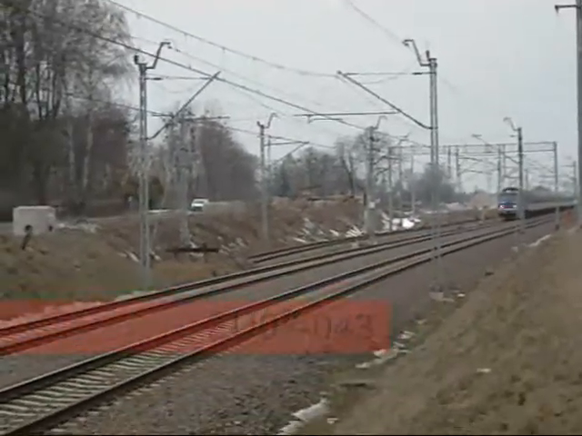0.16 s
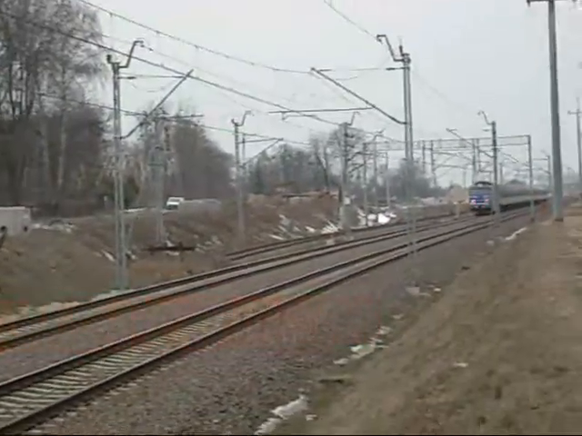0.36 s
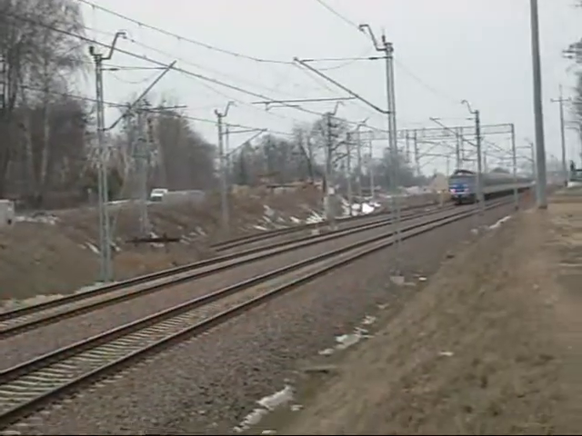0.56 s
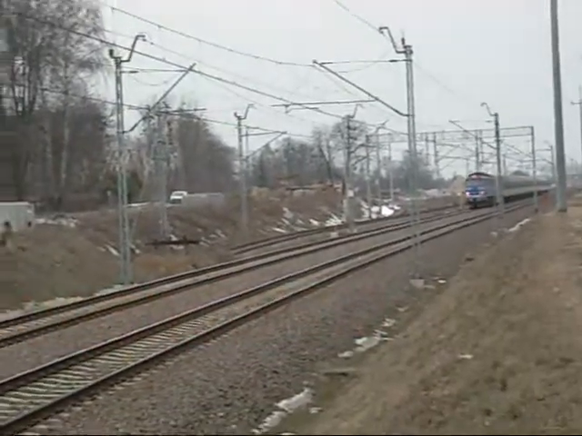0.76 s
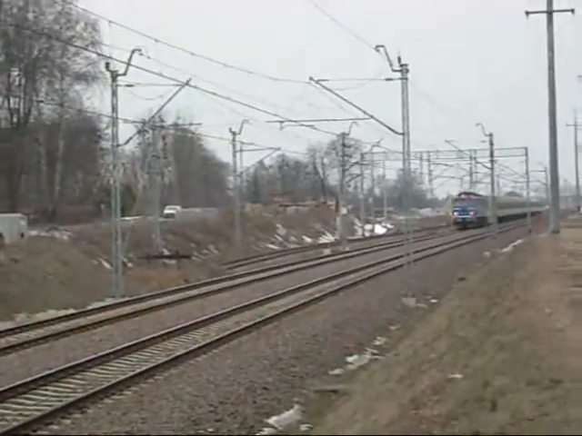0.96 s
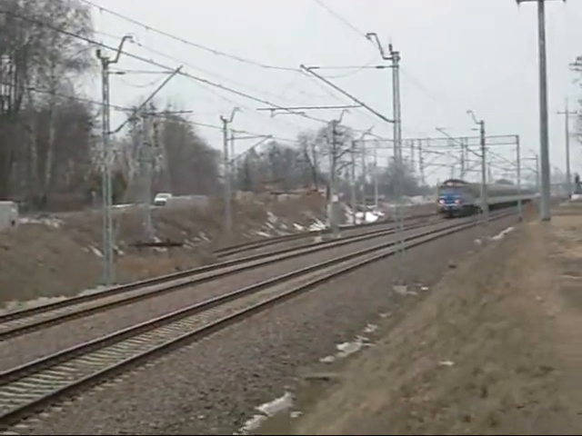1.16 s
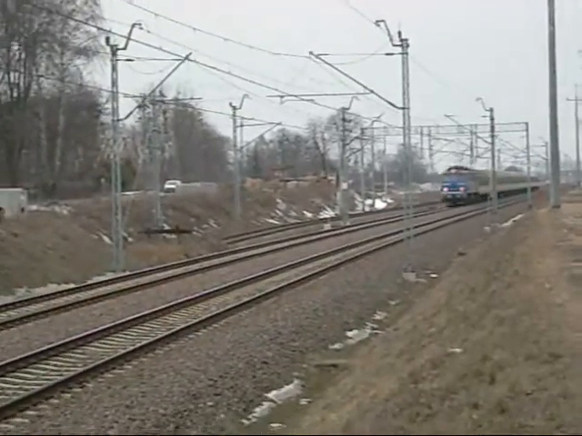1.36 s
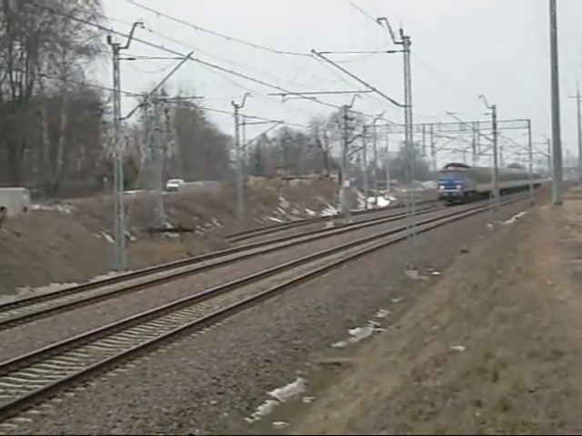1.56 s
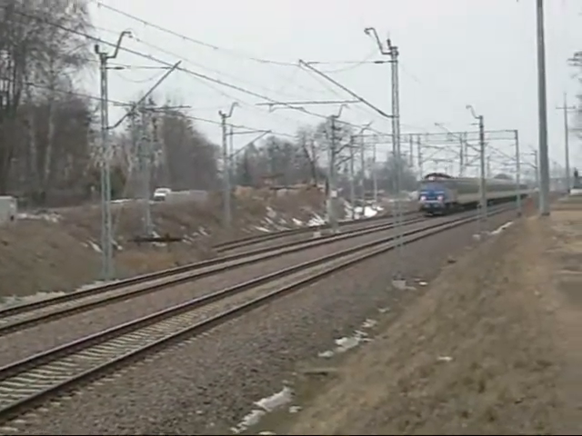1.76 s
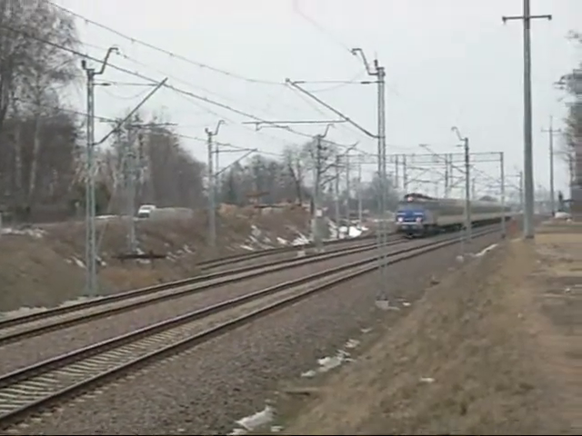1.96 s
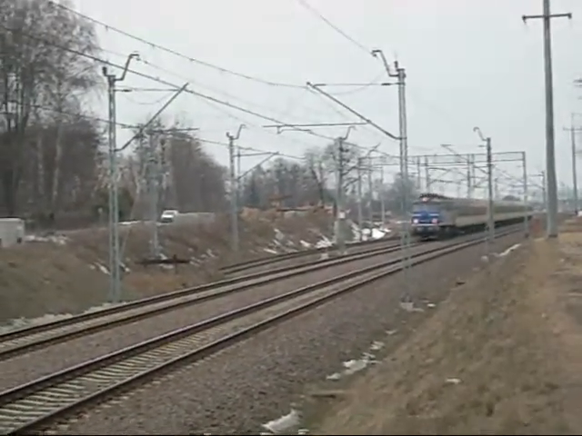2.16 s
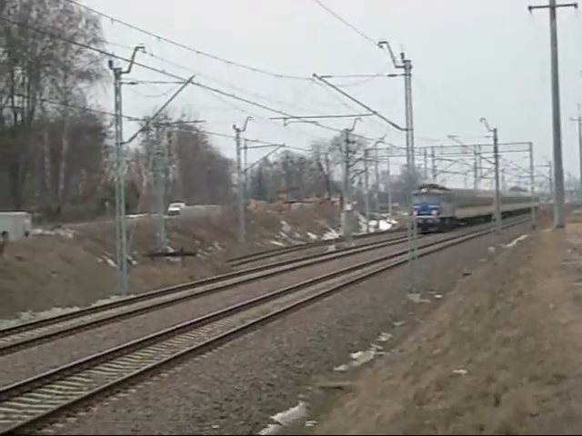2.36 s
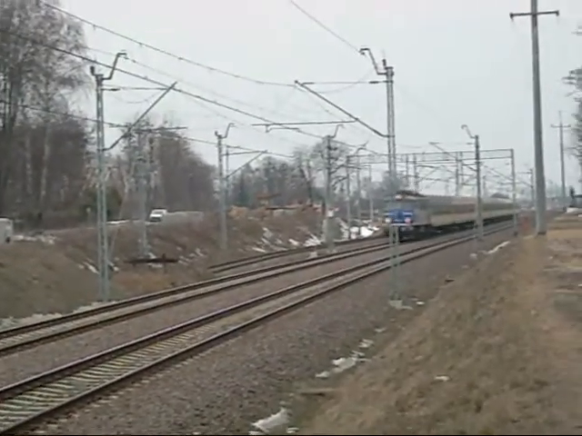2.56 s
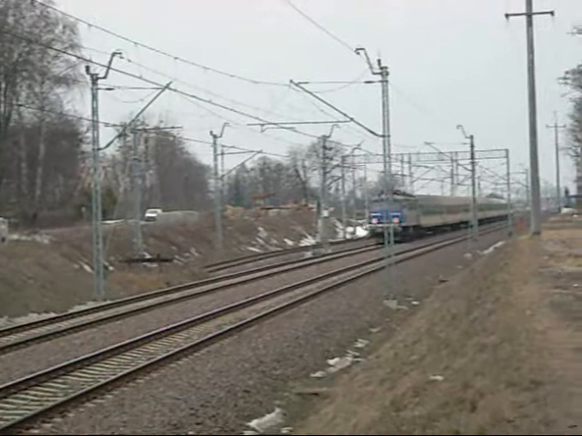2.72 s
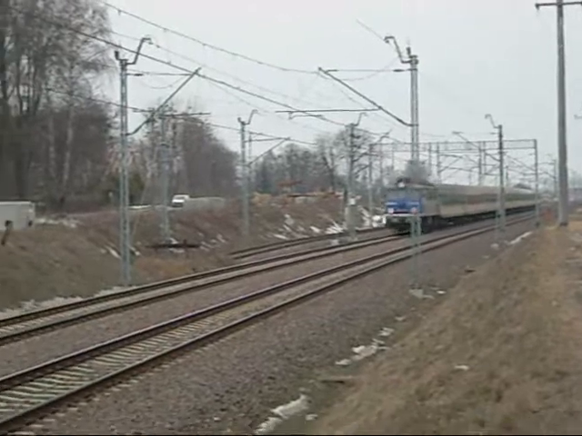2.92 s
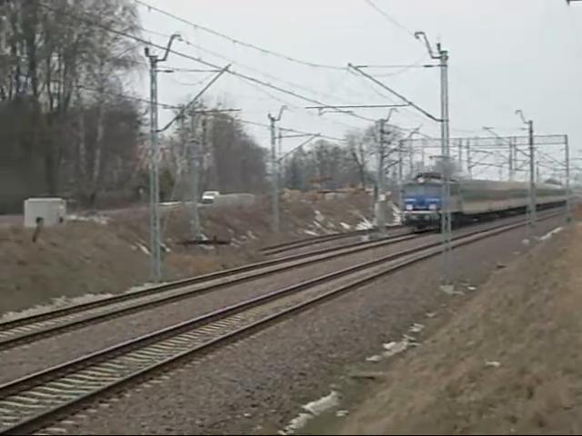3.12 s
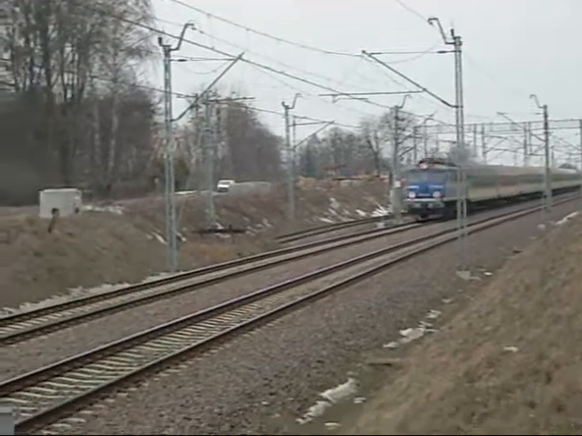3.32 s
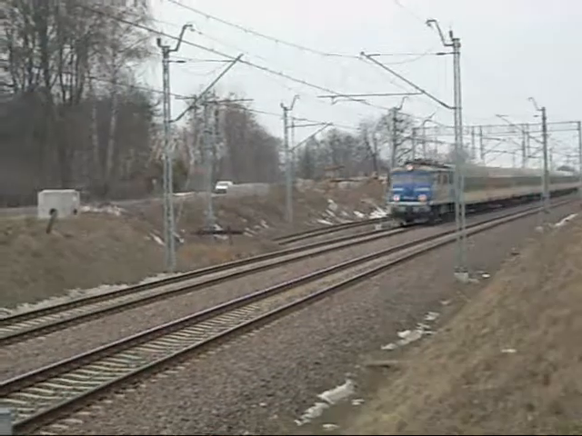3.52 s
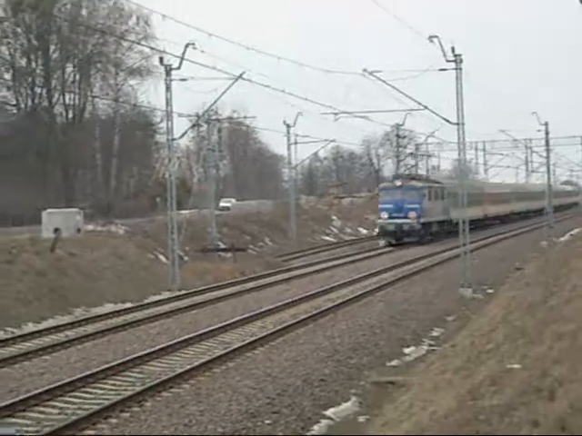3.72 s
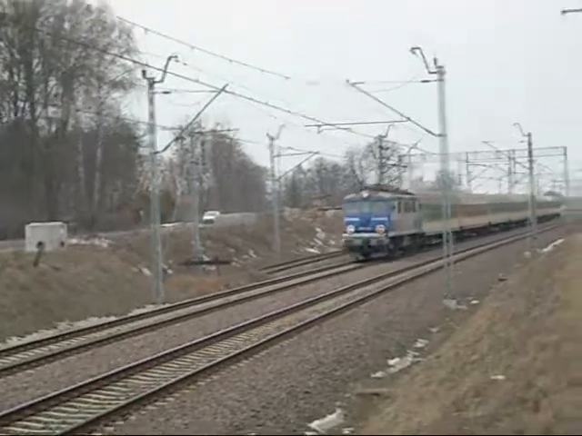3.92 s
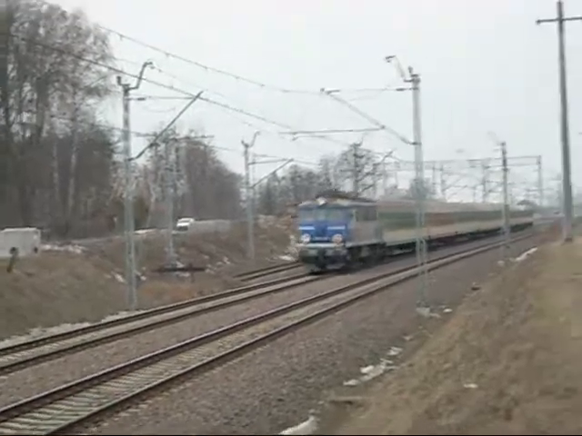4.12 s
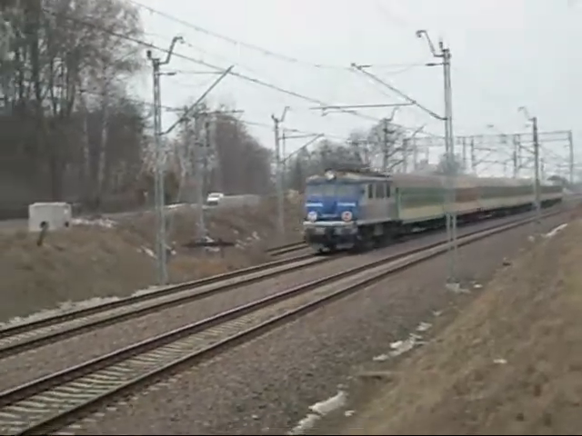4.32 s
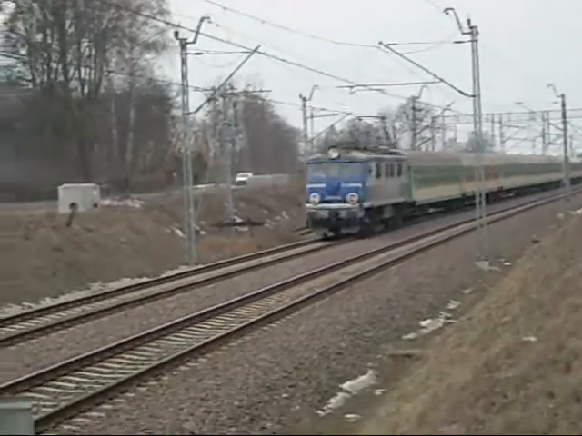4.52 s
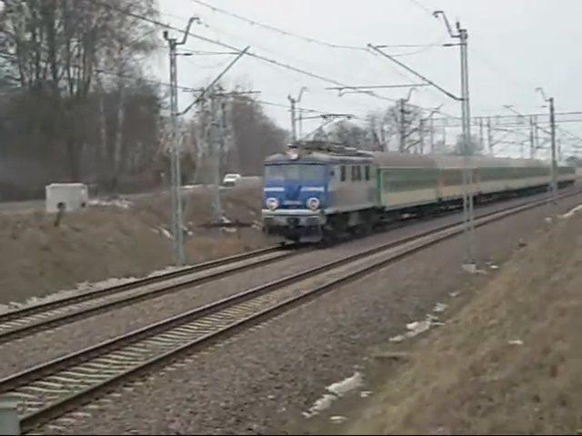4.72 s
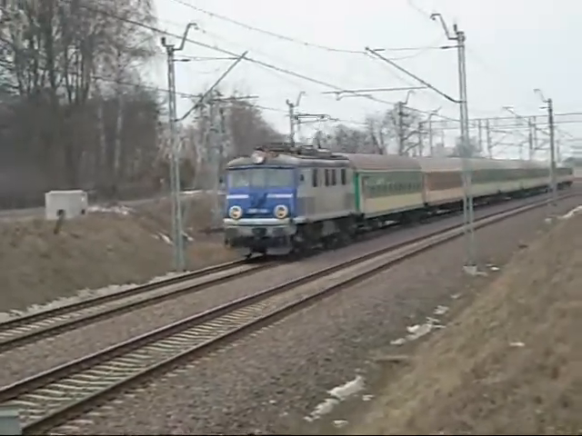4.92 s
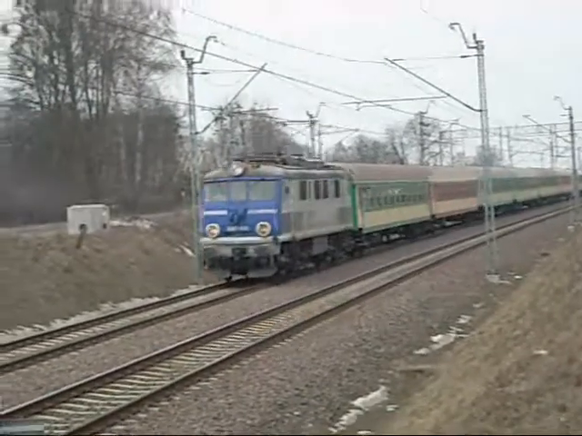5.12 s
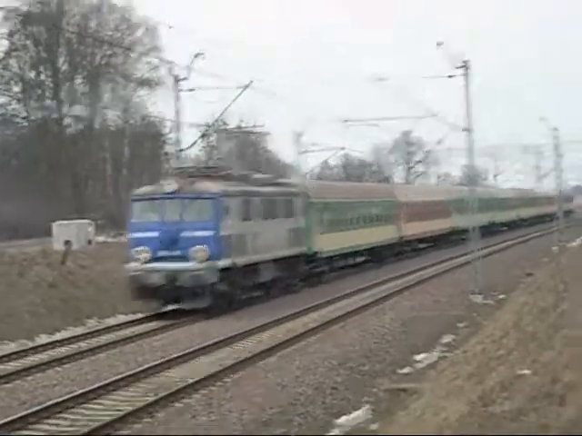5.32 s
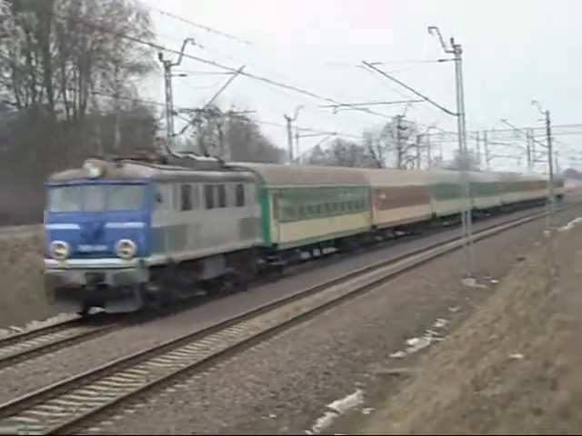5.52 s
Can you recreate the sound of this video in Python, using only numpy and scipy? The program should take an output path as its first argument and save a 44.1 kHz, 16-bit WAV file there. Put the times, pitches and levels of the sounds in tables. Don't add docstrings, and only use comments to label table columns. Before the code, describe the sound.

Blustery wind buffets a cheap camera beside railway tracks as an approaching train grows from faint metallic singing to a roaring, booming rush.

```python
import sys
import numpy as np
from scipy import signal
from scipy.fft import rfft, irfft, next_fast_len
from scipy.io import wavfile
from scipy.ndimage import uniform_filter1d, map_coordinates

SR = 44100
rng = np.random.default_rng(int(sys.argv[2]) if len(sys.argv) > 2 else 0)


def dump(signal):
    limited = np.clip(np.atleast_2d(signal).T, -1, 1)
    pcm = np.round(limited * 32767).astype(np.int16)
    wavfile.write(sys.argv[1], SR, pcm)


def field_ratio(decibels):
    return 10 ** (np.asarray(decibels, dtype=float) / 20)


N = 245637
TURN_S = 0.1146


def seconds():
    return np.arange(N) / SR


def noise():
    return rng.standard_normal(N)


def evened(x):
    return x / np.sqrt(np.mean(x ** 2) + 1e-20)


def column(table, index):
    rows = np.array(table, float)
    return np.interp(seconds(), rows[:, 0], rows[:, index])


def colour(x, points):
    point_hz, point_db = np.transpose(points)
    size = next_fast_len(len(x), True)
    hz = np.fft.rfftfreq(size, 1 / SR)
    gain_db = np.interp(np.log(hz + 1), np.log(point_hz + 1), point_db, -120, -120)
    return evened(irfft(rfft(x, size) * field_ratio(gain_db), size)[:len(x)])


def drift(hz):
    return colour(noise(), [(0.5, 0), (hz, -3), (2 * hz, -30)])


def steadied(x, steady, span_s):
    size = np.sqrt(uniform_filter1d(x ** 2, int(span_s * SR)) + 0.02)
    return evened(x / size ** steady)


def swells(base_db, times_s, tops_db, spans_s):
    coarse_s = np.arange(0, N + 64, 64) / SR
    shapes = np.exp(-((coarse_s[:, None] - times_s) / spans_s) ** 2)
    bells = field_ratio(np.asarray(tops_db)) ** 2 * shapes
    return np.sqrt(field_ratio(base_db) ** 2 + np.interp(seconds(), coarse_s, bells.sum(1)))


def eddies():
    # (time [s], peak [dB], pitch [Hz], length [ms])
    strong = [(0.539, -12, 225, 19), (0.588, -12, 161, 7.1), (0.614, -7, 192, 7.7), (0.705, -8.5, 137, 13),
              (0.761, -9, 150, 8.4), (0.8, -12, 154, 8.9), (0.921, -7.5, 127, 11), (0.954, -8, 176, 4.7),
              (1.048, -1, 125, 20), (1.077, -4, 212, 18), (1.143, -7.5, 174, 5.9), (1.41, -6, 190, 13),
              (1.572, -8, 168, 9.2), (1.638, -4, 212, 8.6), (1.699, -3.5, 159, 9.6), (1.73, -5.5, 146, 11),
              (1.853, -6, 195, 12), (1.914, -10, 255, 8.4), (1.935, 2.5, 210, 11.5), (1.955, 3.5, 269, 9.4),
              (2.083, -3, 297, 12.7), (2.311, -2, 201, 7.1), (2.334, -7, 204, 20), (2.904, -10.5, 152, 9.3),
              (3.346, -10.5, 148, 17), (3.456, -5.5, 175, 31), (3.609, -7, 193, 4.4),
              (3.672, -4.5, 183, 7.2), (5.442, -11, 220, 25), (5.509, -12, 190, 7.9)]
    # (time [s], peak [dB], pitch [Hz])
    puffs = [(0.012, -14, 119), (0.068, -18.5, 211), (0.09, -15.5, 155), (0.275, -14, 123),
             (0.368, -16, 180), (0.837, -14, 199), (0.464, -16, 113), (0.678, -11, 144), (1.985, -11, 130),
             (1.274, -12.5, 183), (1.451, -13.5, 160), (1.522, -13, 164), (1.546, -12.5, 192),
             (1.588, -14, 239), (1.653, -15, 242), (2.235, -16.5, 238), (2.375, -15, 180),
             (2.602, -12.5, 127), (2.659, -18, 145), (2.698, -10.5, 146), (2.952, -12.5, 160),
             (1.25, -13, 142), (3.207, -11.5, 164), (3.315, -17, 197), (3.411, -15, 150),
             (3.492, -13.5, 147), (3.708, -18, 138), (2.791, -18, 128), (3.187, -15, 141),
             (3.237, -20, 160)]
    # (time [s], peak [dB], pitch [Hz],
    # length [ms])
    knocks = [(3.954, -19, 120, 16), (4.066, -21, 99, 18), (4.45, -21, 123, 20), (4.6, -19, 120, 17),
              (4.722, -17, 111, 31), (4.87, -20, 100, 18), (5.17, -14, 116, 25), (5.248, -18, 470, 8.5),
              (5.27, -17.4, 402, 7), (5.349, -23, 354, 7.3), (5.36, -13, 121, 25), (5.379, -13, 249, 9.5),
              (5.528, -13, 271, 20)]
    puff_ms, glide = 14.6, 0.26
    rows = strong + [(*puff, puff_ms) for puff in puffs] + knocks
    chances = rng.uniform(-1.32, 1, (len(rows), 3))
    t = np.linspace(-0.08, 0.08, int(0.16 * SR))
    out = np.zeros(N + SR)
    for (time_s, db, hz, ms), (start, wobble, turn) in zip(rows, chances):
        u = t / (0.53 * ms / 1000)
        phase = 2 * np.pi * hz * t * (1 - glide * turn * np.tanh(u))
        phase += 0.36 * start + 0.73 * np.sin(4.32 * u + 3 * wobble)
        wave = -np.cos(phase) - 0.28 * np.cos(2 * phase)
        at = round(time_s * SR) + SR // 2 - len(t) // 2
        out[at:at + len(t)] += field_ratio(db) * wave * np.exp(-u ** 2)
    return out[SR // 2:][:N]


def wind():
    # (frequency [Hz], level [dB per Hz])
    thump_band = [(8, -5), (25, 2), (50, -0.5), (90, -3.5), (130, -6)]
    # (frequency [Hz], level [dB per Hz])
    flutter_band = [(60, -6), (100, -8), (180, -8), (300, -17.5), (500, -32.5), (800, -53)]
    # (time [s], level [dB], flutter against it [dB])
    breeze = [(0, -30, -6), (0.2, -43, -10), (0.7, -24, -4), (0.89, -30, -6), (1.0, -25, -2),
              (1.33, -29, -6), (1.75, -23, -4), (2.04, -26, -7), (2.25, -26, -6), (2.46, -31, -7),
              (2.7, -26.5, -4), (3.3, -31, -8), (3.75, -29, -9), (4.0, -30, -4), (4.4, -32, -2),
              (4.9, -34.5, 4.5), (5.2, -28.5, 0.5), (5.57, -23.5, -1)]
    # (time [s], thump [dB], half length [s], flutter [dB])
    gusts = [(0.053, -18, 0.079, -26.5), (0.324, -25, 0.074, -29), (0.472, -20, 0.084, -29.5),
             (0.606, -11, 0.035, -19.5), (0.69, -17.5, 0.036, -26), (0.782, -16, 0.023, -25),
             (0.847, -16, 0.012, -18), (0.952, -18, 0.038, -21), (1.075, -13.5, 0.053, -24),
             (1.167, -12.5, 0.025, -24), (1.253, -14, 0.018, -28), (1.433, -17, 0.034, -22),
             (1.502, -13, 0.014, -27), (1.56, -10.5, 0.018, -20), (1.696, -12.5, 0.021, -17),
             (1.758, -20, 0.03, -18), (1.853, -11.5, 0.025, -20.5), (1.95, -6.5, 0.031, -14.5),
             (1.988, -17, .012, -22), (2.08, -9.5, .012, -10.5), (2.164, -15, 0.034, -28),
             (2.32, -12.5, 0.032, -12), (2.562, -17, 0.017, -27.5), (2.647, -19, 0.065, -22.5),
             (2.796, -18.5, 0.027, -23.5), (3.153, -25, 0.062, -22), (3.428, -22, .06, -28),
             (3.678, -15, 0.042, -31), (3.576, -20, 0.024, -42), (5.506, -20, 0.036, -32)]
    thump = steadied(colour(noise(), thump_band), steady=0.89, span_s=0.066)
    flutter = steadied(colour(noise(), flutter_band), steady=0.69, span_s=0.02)
    flutter = evened(flutter * field_ratio(1.3 * drift(27)))
    times_s, thump_db, spans_s, flutter_db = np.transpose(gusts)
    breeze_db = column(breeze, 1)
    thump_gain = swells(breeze_db, times_s, thump_db, spans_s)
    flutter_gain = swells(breeze_db + column(breeze, 2), times_s, flutter_db, spans_s)
    return thump_gain * thump + flutter_gain * flutter + eddies()


def grown(start_db, share):
    # (time [s], loudness [dB])
    loudness = [(0.0, -30), (0.6, -29), (1.2, -28), (1.6, -26.5), (2.1, -24.5), (2.7, -23), (3.3, -21.5),
                (3.65, -20), (3.9, -17.5), (4.2, -18.5), (4.5, -15.5), (4.65, -15), (4.8, -14.5),
                (4.95, -14), (5.1, -12), (5.25, -12.5), (5.4, -11), (5.57, -11.5)]
    far_db = -30
    return start_db + share * (column(loudness, 1) - far_db)


def nearness():
    # (time [s], nearness [0-1])
    approach = [
        (0, 0.29),
        (3, 0.51),
        (4.2, 0.64),
        (5.6, 0.9),
    ]
    return np.clip(column(approach, 1), 0, 1)


def tread(memory, flat):
    flat_s = 0.062
    size = round(TURN_S * SR)
    memory = np.clip(memory, 0, 0.95)
    fresh = rng.standard_normal((N // size + 12, size))
    turns = signal.lfilter([1], [1, -memory], fresh, axis=0)[10:].ravel()[:N]
    spot = np.cos(2 * np.pi * (seconds() - flat_s) / TURN_S)
    return turns * (1 + flat * spot)


def rails():
    # (frequency [Hz], level [dB per Hz])
    upper_band = [(1230, -25), (1275, 12), (1300, 10), (1340, 8.5), (1375, 10), (1400, -64)]
    # (frequency [Hz], level [dB per Hz])
    line_band = [(1310, -36), (1335, 11), (1360, -39)]
    # (frequency [Hz], level [dB per Hz])
    lower_band = [(1100, -30), (1165, -7), (1190, -2), (1222, 0), (1245, -6), (1285, -22)]
    # (time [s], wheel-turn depth [dB], coupling to the steel [dB])
    throb = [(0, -1.5, 1), (0.6, 1.5, -1.5), (1.2, -2.5, 0), (1.8, 1, 3), (2.3, 2, 2.5), (2.6, 3, 1.5),
             (3.0, -2, -1), (3.35, -3, 0.5), (3.6, 6, -5), (3.9, 3, 0), (4.5, -1, 2.5), (5.05, -1, 2.5),
             (5.57, 3, -3)]
    # (time [s], level [dB])
    joints = [(0.48, -38), (0.82, -25), (1.88, -26), (2.25, -25), (2.48, -26), (3.16, -22), (3.37, -21.5),
              (3.74, -27), (4.1, -20.5), (4.19, -23), (4.34, -35), (4.65, -18), (4.98, -28), (5.46, -22),
              (5.57, -17)]
    throb_s, joint_s = 0.051, 0.035
    song = colour(tread(0.69, 0.1), upper_band)
    line = colour(tread(1.0, 0), line_band)
    upper = steadied(song + field_ratio(-10) * line, steady=0.29, span_s=0.08)
    lower = steadied(colour(tread(0.52, 0.1), lower_band), steady=0.57, span_s=0.06)
    throb_db = column(throb, 1) * np.cos(2 * np.pi * (seconds() - throb_s) / TURN_S)
    upper_gain = field_ratio(grown(-26, 0.24) + column(throb, 2) + throb_db)
    lower_gain = swells(grown(-35, 0.99), *np.transpose(joints), joint_s)
    return upper_gain * upper + lower_gain * lower


def layer(drive, far, near, level_db, flicker_db):
    share = nearness()
    blend = (1 - share) * colour(drive, far) + share * colour(drive, near)
    return field_ratio(level_db + flicker_db * drift(9.8)) * evened(blend)


def rings(drive):
    # (frequency [Hz], width [Hz], far level [dB], near level [dB])
    modes = [(405, 25, -22, -23), (635, 12, -19, -13), (689, 12, -19, -14), (741, 12, -20, -13),
             (800, 14, -18, -20), (950, 20, -20, -11)]
    share = nearness()
    out = np.zeros(N)
    for hz, width_hz, far_db, near_db in modes:
        band = [(hz - 2 * width_hz, -30), (hz, 0), (hz + 2 * width_hz, -30)]
        out += field_ratio(far_db + share * (near_db - far_db)) * colour(drive, band)
    return out


def drone():
    # (frequency [Hz], level [dB per Hz])
    far = [(250, -17), (480, -12), (620, -5.5), (760, -4), (880, -4.5), (960, 6), (1050, 7), (1130, 1),
           (1250, -35)]
    # (frequency [Hz], level [dB per Hz])
    near = [(300, -19), (500, -8), (620, 2.5), (700, 0.5), (800, 4), (880, 5), (960, 4.5), (1120, -4),
            (1250, -25)]
    level_db = grown(-30, 1)
    body = layer(tread(0.33, 0.021), far, near, level_db, flicker_db=0.43)
    return body + field_ratio(level_db) * rings(tread(0.58, 0.1))


def hiss():
    # (frequency [Hz], level [dB per Hz])
    far = [(1200, -43), (1390, -7.5), (1750, 2), (2100, -4.5), (2350, -4), (2600, -9.5), (3300, -16),
           (3700, -17.5), (4000, -32.5), (4300, -32)]
    # (frequency [Hz], level [dB per Hz])
    near = [(1200, -16), (1400, -12), (1600, -11.5), (2000, -10), (2230, -7), (2400, -11), (3000, -13.5),
            (3700, -12.5), (3980, -18), (4300, -25)]
    # (time [s], level [dB])
    clear = [(0, 0.5), (0.6, 0.5), (1.4, 0), (2.1, 0), (2.7, -2), (3.3, -1.5), (3.75, 0), (3.9, 1),
             (4.25, -0.5), (4.6, -1.5), (4.8, 0.5), (5.2, -1), (5.57, -1)]
    return layer(noise(), far, near, grown(-27, 0.92) + column(clear, 1), flicker_db=0.5)


def surge(table, from_s, level_db, band, db):
    half_length_s = 0.036
    fade = np.clip((seconds() - from_s) / 0.24, 0, 1)
    gain = fade * field_ratio(db) * swells(level_db, *np.transpose(table), half_length_s)
    return gain * colour(tread(0.3, 0), band)


def whine():
    # (time [s], level [dB])
    whines = [(4.066, -17), (4.22, -15), (4.456, -10.5), (4.724, -12), (5.02, -22), (5.228, -10),
              (5.312, -21), (5.57, -7.5)]
    # (frequency [Hz], level [dB per Hz])
    band = [(2080, -12), (2190, -2), (2240, -3), (2300, -3), (2420, -22)]
    return surge(whines, 3.8, grown(-34, 0.6), band, db=-6.0)


def boom():
    # (time [s], level [dB])
    booms = [(4.52, -12), (4.73, -19), (4.86, -18), (4.99, -15), (5.085, -10.5), (5.2, -13), (5.29, -11),
             (5.406, -7.5), (5.49, -11), (5.57, -11)]
    # (frequency [Hz], level [dB per Hz])
    band = [(520, -16), (610, 1.5), (700, -1.5), (770, -4), (860, -36)]
    return surge(booms, 4.4, grown(-34.5, 1), band, db=-3.5)


def train():
    return rails() + drone() + hiss() + whine() + boom()


def scene():
    return (wind() + train())[None]


def top_cut(x):
    return signal.sosfilt(signal.butter(12, 15770, fs=SR, output="sos"), x)


def record(dry):
    clock_hz, mean_hz = 8000, 8010.907
    block_samples, block_start_s = 267, 0.009
    block, into_s = np.divmod(seconds() - block_start_s, block_samples / mean_hz)
    sample = block * block_samples + np.floor(into_s * clock_hz)
    place = np.clip((sample / mean_hz + block_start_s) * SR, 0, N - 1)
    held = map_coordinates(dry[0], [place], order=3)
    mix = np.clip(held, -0.97, 0.97)[None]
    return top_cut(mix)


dry = scene()
out = record(dry)
dump(out)
```